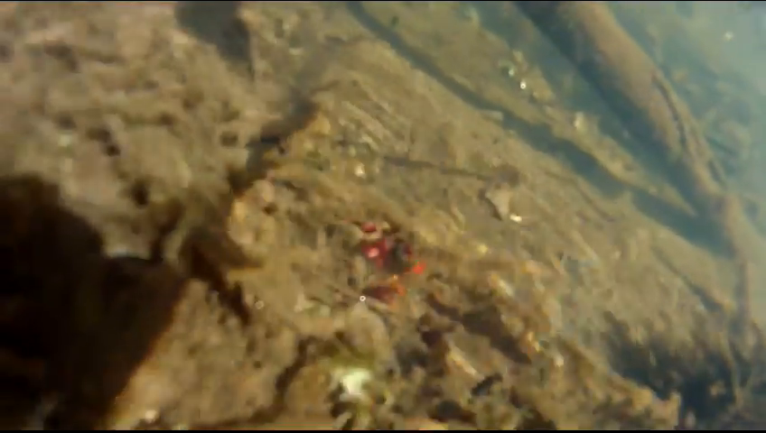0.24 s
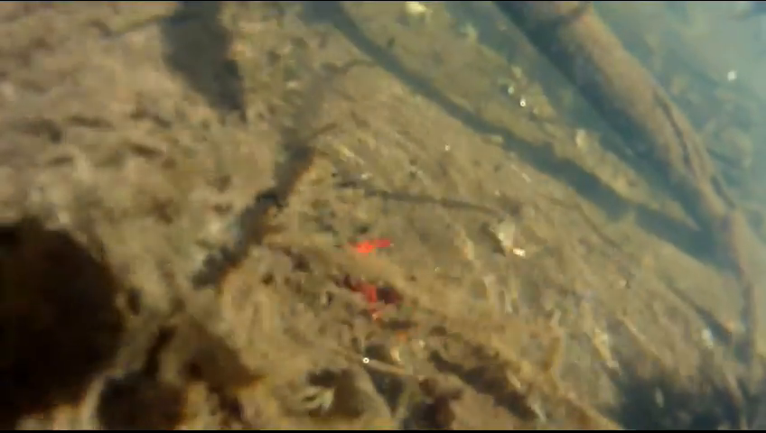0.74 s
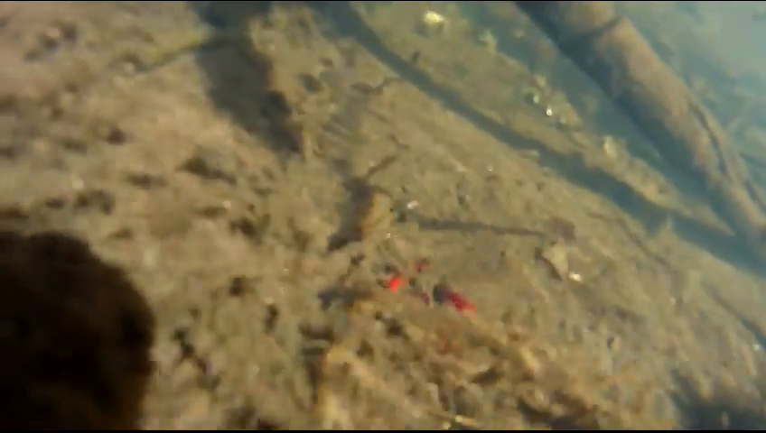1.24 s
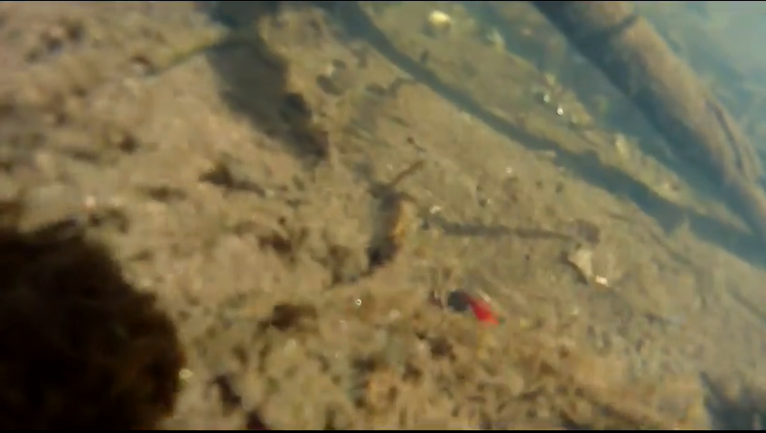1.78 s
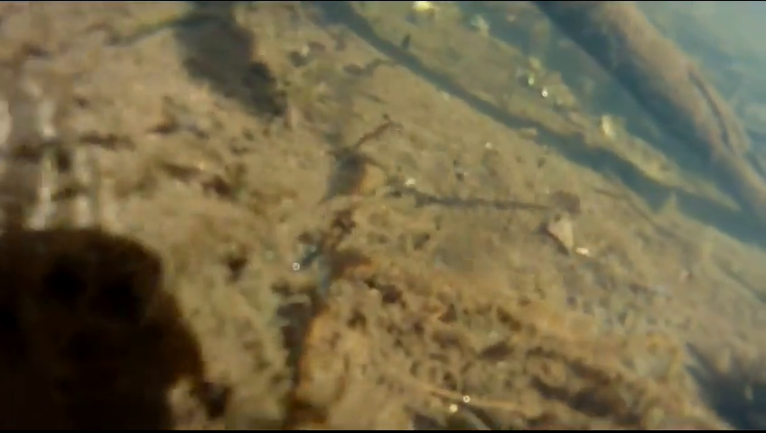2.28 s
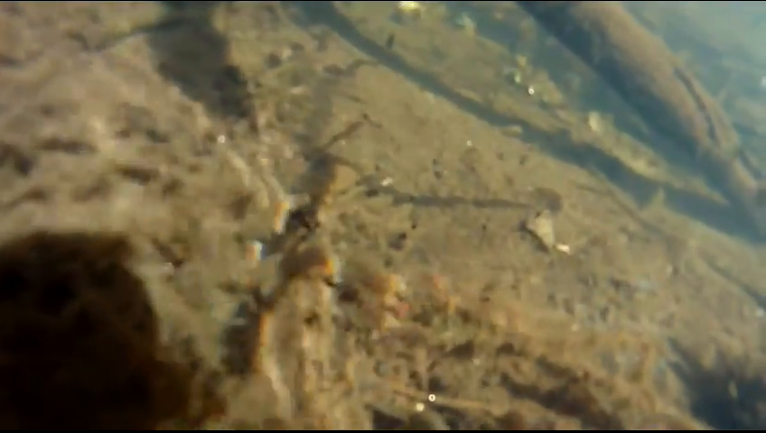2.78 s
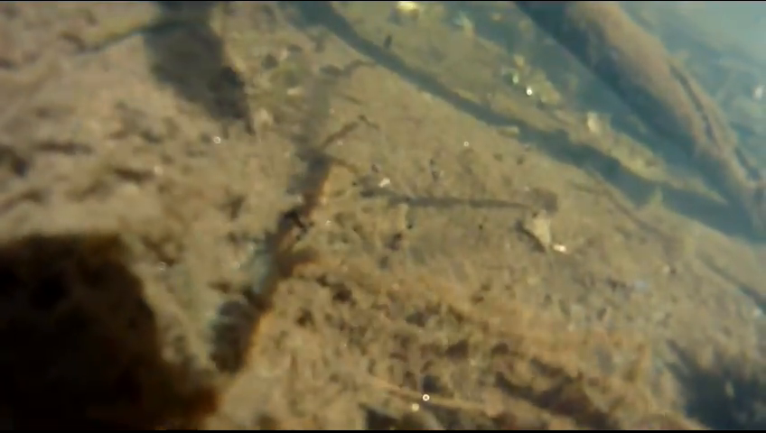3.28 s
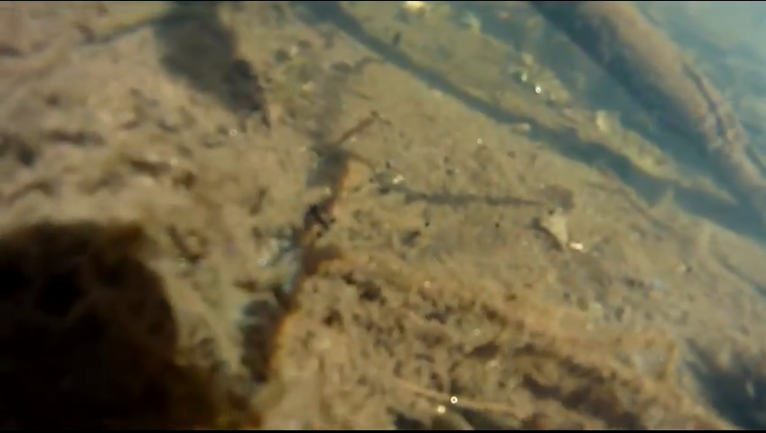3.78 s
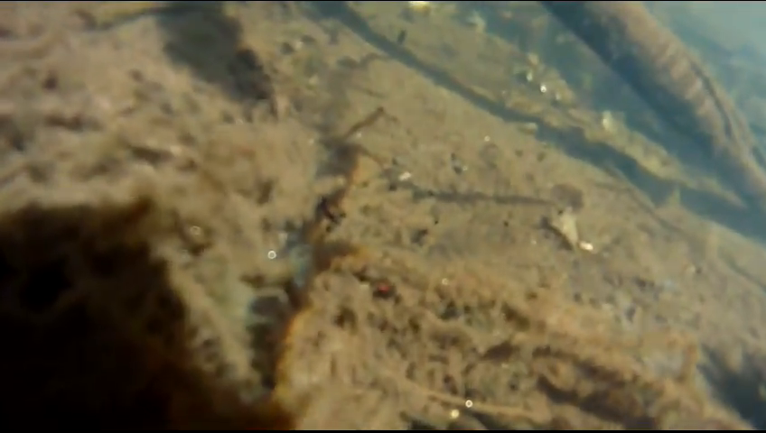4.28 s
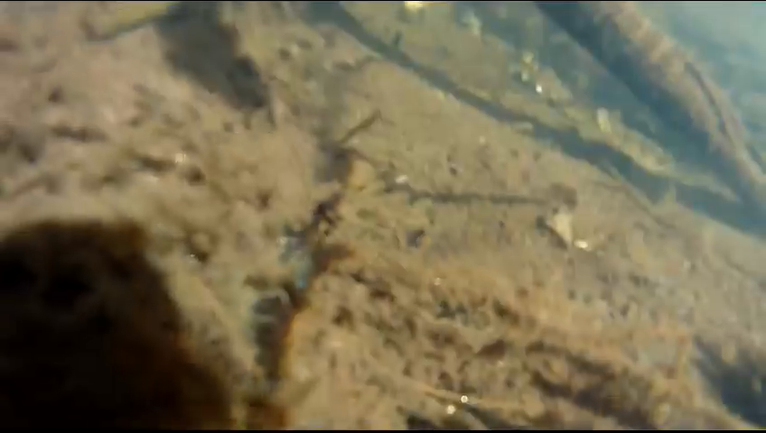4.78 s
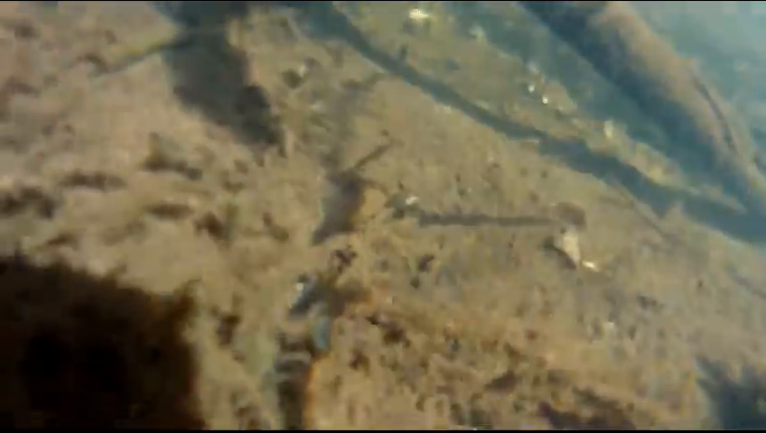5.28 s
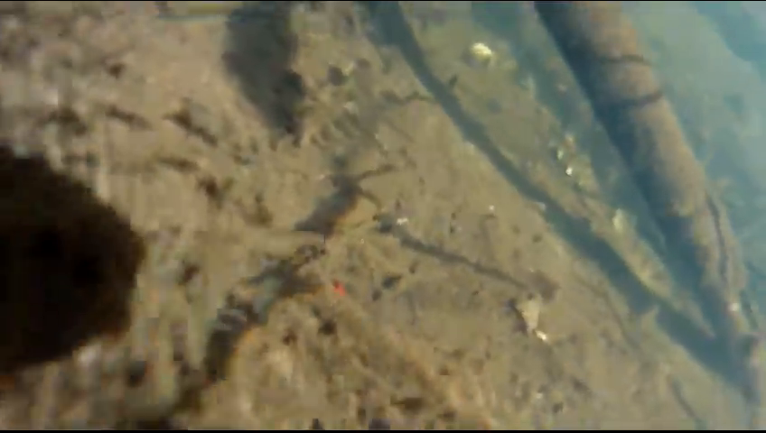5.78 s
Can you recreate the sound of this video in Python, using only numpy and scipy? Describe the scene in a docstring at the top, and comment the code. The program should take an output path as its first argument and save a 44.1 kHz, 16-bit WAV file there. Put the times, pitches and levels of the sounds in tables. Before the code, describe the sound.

A submerged plastic housing is gripped and rubbed in a shallow river: low water swirls, gritty scuffs, clicks and increasingly loud, ringing knocks.

```python
"""In a shallow river, a camera in a plastic housing is held under water. Water noise rumbles and gurgles around
the case, and a hand rubs it so that its resonances ring. Damped tones and cracks make the knocks, pressure
pulses the thumps, short tones the bubbles and grit. Filtered grains make the coarse scrapes of the hand on the
case; a palm boom and a fingertip squeak are tuned noise. The microphone inside overloads on the hardest thumps,
and coarse sampling adds a thin fizz."""
import sys
import numpy as np
from scipy import signal
from scipy.fft import rfft, irfft
from scipy.io import wavfile
from scipy.ndimage import uniform_filter1d

SR = 44100
rng = np.random.default_rng(int(sys.argv[2]) if len(sys.argv) > 2 else 0)


def output_pcm(signal):
    """Save a mono or channel-first signal as 16-bit PCM at the path in sys.argv[1].

    Samples are clipped to [-1, 1] before scaling.
    """
    pcm = np.clip(np.atleast_2d(signal).T, -1, 1) * 32767
    wavfile.write(sys.argv[1], SR, np.round(pcm).astype(np.int16))


N = 266364
T = np.arange(N) / SR  # time of each sample, s
HZ = np.fft.rfftfreq(N, 1 / SR)  # frequencies of the filters

# All levels in the tables are relative: each layer adds its own trim.
# how hard the hand drags on the case: time [s], level [dB]
DRAG = [(0, -48), (.2, -38.5), (.85, -37.5), (1.36, -35), (1.65, -39), (1.77, -39), (1.85, -39), (2.2, -34),
        (2.62, -34), (2.722, -28.5), (2.76, -40.5), (2.93, -46), (3.23, -47.5), (3.42, -35.5),
        (4.02, -38.5), (4.16, -49.5), (4.76, -32), (4.88, -57), (4.96, -49), (5.12, -28.5), (5.32, -30),
        (5.52, -26.5), (6.04, -24)]
# strength of the rasp compared with the body of the rubbing: time [s], level [dB]
RASP = [(0, -3), (.5, -1), (1.1, -.5), (1.385, -5.5), (1.43, -10.5), (2.05, -10), (2.3, -7), (3.25, -10),
        (3.72, -4.5), (4.3, -13.5), (4.75, -7.5), (4.89, -14), (5.05, -11.5), (5.25, -16), (5.65, -7.5),
        (5.78, -10), (6.04, -9)]
# knocks, each a ring and a crack: start [s], ring_level [dB], ring_pitch [Hz], crack_level [dB], crack_top [Hz]
KNOCKS = [(.0795, -22, 744, -36, 2030), (.5758, -14, 630, -43, 2000), (1.275, -15, 700, -33, 2980),
          (1.3558, -15, 680, -24, 4200), (1.6591, -28, 670, -15.5, 2000), (1.7922, -12.5, 1100, -30, 3000),
          (1.8645, -11, 830, -15.5, 3270), (1.901, -31, 910, -35, 2190), (1.9649, -22, 1090, -24.5, 2480),
          (2.7255, -8, 825, -27, 2200), (3.0815, -22, 884, -24, 2100), (3.0968, -19.5, 845, -32, 1500),
          (3.253, -21.5, 696, -46, 1500), (3.9538, -13.5, 930, -47, 2000), (4.284, -22.5, 830, -48, 2000),
          (4.6958, -4, 880, -13, 3640), (4.8533, -9.5, 484, -12, 4100), (5.155, -3.5, 906, -27, 2230),
          (5.2325, 1, 918, -11.5, 3100), (5.3755, -5.5, 780, -13, 2410), (5.4698, -3, 938, -30, 2800),
          (5.491, -8, 970, -21, 3500), (5.6925, -8.5, 946, -27, 2600), (5.795, -8.5, 1020, -24, 2400),
          (5.923, -22, 980, -28, 2500), (6.001, 3.5, 1024, -21, 3500)]
# a pressed finger judders in evenly spaced slips: centre of the first slip, spacing
FIRST_SLIP_S, SLIP_GAP_S = 5.613, 0.0458


def amp(db):
    """Turns decibels into a gain."""
    return 10 ** (np.asarray(db) / 20)


def unit(x):
    """Scales to an rms (average strength) of 1."""
    return x / np.sqrt(np.mean(x ** 2) + 1e-20)


def curve(rows):
    """Joins the points of a (time, value) table into a curve over time."""
    return np.interp(T, *np.transpose(rows))


def shaped(x, gain):
    """Filters by a gain for each frequency."""
    return irfft(rfft(x) * gain, N)


def spectrum(points):
    """Turns (Hz, dB) points into a gain for each frequency."""
    hz, db = np.transpose(points)
    return amp(np.interp(np.log(HZ + 1), np.log(hz), db))


def wander(rate_hz):
    """Makes random motion of rms 1, mostly slower than rate_hz."""
    noise = rng.standard_normal(N)
    return unit(shaped(noise, 1 / (1 + (HZ / rate_hz) ** 4)))


def grains(per_s, spread_db):
    """Makes random clicks of either sign, a few much larger than the rest."""
    size = amp(spread_db * np.minimum(rng.exponential(1, N), 4))
    sign = rng.choice([-1, 1], N)
    lands = rng.random(N) < per_s / SR
    return unit(size * sign * lands)


def steadied(x, size):
    """Evens out the slow level of a noise and keeps its fine lumps; size is in samples."""
    power = uniform_filter1d(uniform_filter1d(x ** 2, size), size)
    return x / np.sqrt(power + 1e-9)


def ringing(x, gain):
    """Filters so that every click rings only after it lands (minimum phase)."""
    cepstrum = irfft(np.log(np.maximum(gain, 1e-5)), N)
    cepstrum[1:N // 2] *= 2  # fold all of the response to after the click
    cepstrum[N // 2 + 1:] = 0
    return shaped(x, np.exp(rfft(cepstrum)))


def low_pass(x, edge_hz, size):
    """Cuts steeply above edge_hz."""
    taps = signal.firwin(size, edge_hz, window=("kaiser", 8), fs=SR)
    return signal.oaconvolve(x, taps, "same")


def resonate(x, hz, width_hz):
    """Rings at the pitch hz, which may move; two passes make the sides steep."""
    turn = np.exp(2j * np.pi * np.cumsum(hz * np.ones(N)) / SR)
    r = np.exp(-np.pi * width_hz / SR)
    slow = signal.lfilter([1], [1, -2 * r, r * r], x / turn)  # shift to 0 Hz, smooth twice
    return unit((turn * slow).real)


def patchy(x, depth_db, span_s, band_hz, size):
    """Lets each band swell and fade on its own."""
    z = signal.stft(x, nperseg=size)[2]
    field = rng.standard_normal(z.shape)
    field = uniform_filter1d(field, max(round(span_s * 2 * SR / size), 1), axis=1)
    field = uniform_filter1d(field, max(round(band_hz * size / SR), 1), axis=0)
    return signal.istft(z * amp(depth_db * unit(field)), nperseg=size)[1][:N]


def swell(s, rise, fall, hold=0):
    """Makes a smooth hump of height 1: attack, hold, release, all in seconds."""
    going_up = np.clip((T - s) / rise, 0, 1)
    going_down = np.clip((T - s - rise - hold) / fall, 0, 1)
    return np.sin(np.pi / 2 * (going_up - going_down)) ** 2


def hump(s, half):
    """Makes a bell of height 1 centred on s, reaching zero 2 * half to either side."""
    return np.maximum(1 - ((T - s) / (2 * half)) ** 2, 0) ** 2


def gestures(rows, attack, release):
    """Makes one envelope for each row that begins with a start and a length in seconds."""
    return np.array([swell(s, attack, release, max(length - attack, 0)) for s, length, *_ in rows])


def grip():
    """Follows how the hand holds the case, from 0 (loose) through 1 (cupped) to 2 (pressed)."""
    # hold of the hand: time [s], grip [0-2, limited below]
    hold_points = [(0, 0), (1.3, 0.1), (1.9, 0.26), (2.15, 0.977), (4.9, 0.93), (5.15, 1.28), (5.45, 1.66),
                   (5.6, 1.98), (5.8, 2.11)]
    return np.clip(curve(hold_points), 0, 2)


def thumps(rebound=0.12, rebound_rise=0.0054, rebound_fall=0.083, quick=0.028):
    """Each push squeezes the air in the case; after a quick one the wall springs back past its rest."""
    # pressure thumps through the case: start [s], signed pressure [relative], rise [s], fall [s]
    pushes = [(-.001, -0.94, 0.0033, 0.24), (0.1025, 0.46, 0.0048, 0.0015), (0.108, -0.36, 0.0032, 0.0043),
              (0.3868, 0.7, 0.0017, 0.002), (0.5377, 0.13, 0.00078, 0.0034), (0.576, 0.41, 0.0015, 0.0041),
              (1.359, 0.26, 0.0021, 0.0019), (1.412, 0.62, 0.0057, 0.0015), (1.465, 0.45, 0.002, 0.0087),
              (1.497, 0.43, 0.0048, 0.0026), (1.6578, 0.33, 0.0025, 0.0061), (1.7556, 0.75, 0.0056, 0.0034),
              (1.8135, 0.24, 0.0022, 0.0023), (1.8182, -0.25, 0.0022, 0.0038),
              (1.8304, -0.62, 0.0023, 0.0046), (1.844, .25, 0.0055, .008), (1.867, -0.44, 0.0026, 0.0073),
              (1.884, .22, 0.0034, 0.0064), (1.8974, 0.42, 0.00245, 0.0039), (1.9043, -1.04, 0.0015, 0.11),
              (3.0822, 0.41, 0.0025, 0.0068), (3.253, 0.35, 0.0028, 0.005), (3.257, -0.19, 0.0014, 0.0042),
              (3.775, -0.26, 0.0017, 0.013), (4.852, -1.84, 0.0018, 0.0033), (5.942, 0.62, 0.0044, 0.011)]
    out = np.zeros(N)
    for s, pressure, rise, fall in pushes:
        strength = rebound * np.exp(-fall / quick)
        spring = strength * swell(s + rise + fall / 2, rebound_rise, rebound_fall)
        out += pressure * (swell(s, rise, fall) - spring)
    return out


def water(sway_db=5, buffet_db=-2, shove_db=-0.5, gurgle_db=2.0, eddies_per_s=260, spread_db=3.0,
          surge_db=2.5, surge_hz=7):
    """Slow pressure swings, buffets on the moving case and small eddies that ring as a gurgle."""
    # spectra of the slow sway and of the buffets: pitch [Hz], level [dB]
    sway_colour = [(8, -46), (18, 22), (28, 14), (40, 16), (55, -13), (90, -26), (200, -126)]
    buffet_colour = [(25, -6), (45, 8), (70, 19.5), (100, -1), (150, -0.5), (300, -41), (700, -76)]
    # gurgle round the open case and under the cupping hand: pitch [Hz], level [dB]
    open_colour = [(50, -41), (90, -5.5), (130, 4.5), (160, -2), (195, -2), (260, -4.5), (340, -12),
                   (480, -16.5), (1000, -61.5)]
    cupped_colour = [(50, -40), (90, -6), (130, 4), (160, -3.5), (195, -1.5), (270, -7.5), (340, -15.5),
                     (480, -26), (1000, -74)]
    # current round the case: time [s], level [dB]
    flow = [(0, -42.5), (.27, -32), (1.4, -31.5), (1.9, -33), (2.3, -36), (2.95, -42), (3.75, -40.5),
            (4.22, -42), (4.7, -35.5), (4.88, -45), (4.97, -45), (5.03, -34), (5.78, -39.5), (6.04, -29)]
    # slow rocking of the camera: time [s], level [dB]
    rocking = [(0, -27.5), (.2, -33.5), (.55, -30), (.75, -38), (1.3, -33), (1.45, -43), (2.6, -31),
               (3.05, -27.5), (4.7, -27.5), (4.92, -31.5), (5.3, -17.5), (5.6, -29), (5.8, -24),
               (6.04, -29)]
    # shoves through the water: start [s], length [s], buffet_level [dB], sway_level [dB]
    shoves = [(1.39, 0.19, -31, -27.5), (1.809, 0.085, -22, -19.5), (1.993, 0.11, -23, -24),
              (2.135, 0.096, -20, -23.5), (2.33, 0.074, -22, -16), (2.738, 0.048, -31.5, -23),
              (5.172, 0.08, -26, -16.5)]

    sway = steadied(shaped(rng.standard_normal(N), spectrum(sway_colour)), size=5000)
    buffet = steadied(shaped(rng.standard_normal(N), spectrum(buffet_colour)), size=3000)
    eddies = grains(eddies_per_s, spread_db) + .5 * rng.standard_normal(N)
    cupped = np.minimum(grip(), 1)
    open_gurgle = (1 - cupped) * ringing(eddies, spectrum(open_colour))
    cupped_gurgle = cupped * ringing(eddies, spectrum(cupped_colour))
    gurgle = steadied(open_gurgle + cupped_gurgle, size=4000)
    current = amp(curve(flow) + surge_db * wander(surge_hz))
    push, swing = amp(np.array(shoves)[:, 2:].T) @ gestures(shoves, attack=0.021, release=0.03)
    return (sway * amp(sway_db) * np.hypot(amp(curve(rocking)), swing)
            + buffet * np.hypot(amp(buffet_db) * current, amp(shove_db) * push)
            + gurgle * amp(gurgle_db) * current)


def housing(drive):
    """The case rings with whatever drives it; the grip decides which resonances speak."""
    # resonances of the housing: pitch [Hz], width [Hz], loose [dB], cupped [dB], pressed [dB]
    resonances = [(444, 145, 12, -17, -9.5), (631, 187, 11, -4, -11), (770, 91, 7.5, 3.5, 1.5),
                  (905, 134, -13, -2.5, -4), (975, 61, -5, -3.5, 6), (1023.4, 52, 8.5, -2, 8.5),
                  (1149, 58, -4, 1, -6), (1310, 190, 6, -37, -22), (1490, 118, 8, -12, -22),
                  (1626, 106, 2, 0.5, -10.5), (1740, 170, -24, -8, -25), (2024, 243, -26, -3, -10.5),
                  (2427, 157, 2, -17, -12.5), (2576, 130, -13, -4.5, -23), (2770, 89, -16, -9, -24),
                  (2958, 180, -4.5, -13.5, -11.5), (3504, 300, -11.5, -21.5, -17.5),
                  (3994, 170, -31, -22, -20.5), (4135, 130, -14, -27, -19.5), (4390, 240, -15.5, -23, -26),
                  (5060, 390, -17.5, -61, -27.5)]
    # broadening of the resonances for loose, cupped, pressed: factor on the width
    broadening = [1.84, 1.72, 1.08]
    # dips where the walls of the housing cancel: pitch [Hz], width [Hz], depth [0-1]
    dip_rows = [(1126, 30, 0.19), (2310, 62, 0.33), (4560, 81, 0.2)]
    hold, sound = grip(), np.zeros(N)
    dips = np.ones(len(HZ))
    for hz, width, depth in dip_rows:
        dips *= 1 - depth / (1 + ((HZ - hz) / width) ** 2)
    for k, factor in enumerate(broadening):
        power = np.zeros(len(HZ))
        for hz, width, *db in resonances:
            power += amp(db[k]) ** 2 / (1 + (2 * (HZ - hz) / (width * factor)) ** 2) ** 2
        share = np.sqrt(np.maximum(1 - abs(hold - k), 0))  # crossfade between neighbouring grips
        sound += share * ringing(drive, unit(dips * np.sqrt(power)))
    return sound


def flexing(x, share, rate_hz):
    """The wall flexes under the hand and bends all its resonances up and down by a small share."""
    return np.interp(T + share / (2 * np.pi * rate_hz) * wander(rate_hz), T, x)


def judder(count=3, half_slip_s=0.0063, slip_db=8):
    """Adds friction in dB from a finger that sticks and slips at a steady pace."""
    return sum(slip_db * hump(FIRST_SLIP_S + k * SLIP_GAP_S, half_slip_s) for k in range(count))


def friction(tremor_db=1.04, tremor_hz=9):
    """Sums drag, strokes, slips, judder and hand tremor into rubbing level and rasp, both in dB."""
    # fingers slide harder for a moment: start [s], length [s], extra_level [dB], extra_rasp [dB]
    strokes = [(0.79, 0.07, 4.5, 0), (1.162, 0.033, 8, -3), (1.807, 0.034, 5.5, 7.5),
               (1.936, 0.012, 6.5, 1), (2.338, 0.06, 6.5, -1.5), (3.023, 0.031, 2.5, -2),
               (3.123, 0.02, 7.5, 1), (3.731, .11, 4, 0), (4.316, 0.046, 4.5, -1), (4.684, 0.027, 2, 1.5),
               (5.105, 0.028, 5.5, 3.5), (5.369, 0.045, 5.5, 0), (5.466, 0.058, 4.5, -1),
               (5.919, 0.019, 7, -4.5), (5.973, 0.017, 7, -4.5)]
    # skin catches and slips in gritty rushes: centre [s], half_length [s], extra_level [dB], extra_rasp [dB]
    slips = [(0.481, 0.0037, 1.5, 4.5), (0.742, 0.018, 6, -1.5), (1.195, 0.0082, 3, -3.5),
             (2.24, 0.054, 4.5, 1.5), (2.376, 0.01, 4.5, 6.5), (4.698, 0.0049, 7, -3),
             (5.115, 0.0022, 9.5, -8), (5.246, 0.0068, 1.5, 4), (5.298, 0.003, -3, 4),
             (5.382, 0.0073, 3, 2.5), (5.412, 0.0067, 2, 4), (5.474, 0.014, 7, 1.5), (5.494, 0.005, 3.5, 2),
             (5.519, 0.012, 4, 0.5), (5.571, 0.025, 5, .5), (5.853, 0.014, 5, -6.5),
             (5.709, 0.005, 3.5, -1), (5.892, 0.014, 5.5, -3), (5.952, 0.009, 9.5, -5.5),
             (5.995, 0.0056, 9, 2)]
    stroke_shapes = gestures(strokes, attack=0.0076, release=0.038)
    stroke_db, stroke_rasp_db = np.array(strokes)[:, 2:].T @ stroke_shapes
    slip_shapes = np.array([hump(s, half) for s, half, *_ in slips])
    slip_db, slip_rasp_db = np.array(slips)[:, 2:].T @ slip_shapes
    level_db = curve(DRAG) + stroke_db + slip_db + judder() + tremor_db * wander(tremor_hz)
    return level_db, curve(RASP) + stroke_rasp_db + slip_rasp_db


def rubbing(per_s=3000, spread_db=1.5, hiss=0.87, flutter_db=1.9, flutter_hz=55, body_db=-1.21,
            bright_db=-3.5, split_hz=1330, top_hz=3200, top_db=6, top_follow=0.61):
    """Tiny stick-slips ring the housing: a round body and a rasp above it."""
    drive = unit(grains(per_s, spread_db) + hiss * rng.standard_normal(N))
    drive *= amp(flutter_db * wander(flutter_hz))
    sound = flexing(housing(drive), share=.012, rate_hz=6.14)
    sound = patchy(sound, depth_db=3.0, span_s=.04, band_hz=350, size=512)  # the contact point creeps
    body = shaped(sound, 1 / (1 + (HZ / split_hz) ** 20))
    level_db, brightness_db = friction()
    rasp = steadied(sound - body, size=1600)
    low_rasp = shaped(rasp, 1 / (1 + (HZ / top_hz) ** 20))
    top_gain = amp(top_db + top_follow * brightness_db)  # soft contact loses the top first
    rasp = low_rasp + (rasp - low_rasp) * top_gain
    body = amp(body_db) * steadied(body, size=1200)
    return amp(level_db) * (body + amp(bright_db + brightness_db) * rasp)


def palm_boom(boom_hz=196, width_hz=65, drag_share_db=-17):
    """Friction and presses excite the air pocket under the palm, so the hollow case booms."""
    # presses of the palm: start [s], length [s], level [dB]
    presses = [(4.626, 0.057, -29.5), (5.128, 0.12, -26), (5.293, 0.23, -23.5), (5.51, 0.12, -33.5),
               (5.875, 0.089, -28)]
    boom = steadied(resonate(rng.standard_normal(N), boom_hz, width_hz), size=2500)
    pressed = amp(np.array(presses)[:, 2]) @ gestures(presses, attack=0.069, release=0.062)
    return boom * np.hypot(amp(drag_share_db + curve(DRAG)), pressed)


def bubbling(level_db=-7, per_s=110, spread_db=3, low_hz=1050, high_hz=3000, tilt_db=-8,
             cycles=16, count=12):
    """Tiny bubbles ping against the open case, following drag and rasp, until the hand cups it."""
    t, out = np.arange(1024) / SR, np.zeros(N)
    for place in np.linspace(0, 1, count):
        hz = low_hz * (high_hz / low_hz) ** place
        decay = np.exp(-np.log(1000) * t * hz / cycles)  # falls 60 dB in this many cycles
        ping = unit(np.sin(2 * np.pi * hz * t) * decay)
        out += amp(tilt_db * place) * signal.oaconvolve(grains(per_s / count, spread_db), ping)[:N]
    openness = np.maximum(1 - grip(), 0)
    return unit(out) * amp(level_db + curve(DRAG) + curve(RASP)) * openness


def knocks(attack=0.0015, level_db=2, loose_cycles=9.6, pressed_cycles=26):
    """One damped tone for each knock; low ones ring longer, and so does the pressed case."""
    out, pressed = np.zeros(N), np.maximum(grip() - 1, 0)
    for s, db, hz, *_ in KNOCKS:
        cycles = loose_cycles + (pressed_cycles - loose_cycles) * np.interp(s, T, pressed)
        t60 = cycles / hz  # seconds to fall 60 dB
        near = (T >= s) & (T < s + 2 * t60)
        t = T[near] - s
        envelope = amp(level_db + db - 60 * t / t60) * (1 - np.exp(-t / attack))
        out[near] += envelope * np.sin(2 * np.pi * hz * t)
    return out


def ticks(level_db=-3.0, soft_s=0.00015, crack_s=0.0014, scrape=0.15, scrape_s=0.0027):
    """Short cracks of the knocks come through the wall of the case; soft contacts are dull."""
    force = np.zeros(N)
    t = np.arange(1024) / SR
    # the contact scrapes on briefly after the crack
    envelope = (np.exp(-t / crack_s) + scrape * np.exp(-t / scrape_s)) * (1 - np.exp(-t / soft_s))
    for s, _, _, db, top_hz in KNOCKS:
        burst = unit(envelope * rng.standard_normal(len(t))) * np.sqrt(np.mean(envelope ** 2))
        dulled = signal.lfilter(*signal.butter(4, top_hz, fs=SR), burst)
        part = force[round(s * SR):][:len(t)]
        part += amp(db) * dulled[:len(part)]
    wall = spectrum([(200, 8.0), (800, 19.0), (1500, 7.5), (2800, 5), (4200, -2.0), (5500, 9.5)])
    return amp(level_db) * ringing(force, wall)


def bubbles(level_db=-1.5, attack=0.0015, release=0.0023):
    """Each air pocket bursts, throbs briefly as a tone and is then smothered against the wall."""
    # air pockets that burst against the case: start [s], peak [dB], pitch [Hz], length [s]
    pockets = [(0.472, -30, 1300, 0.005), (0.6, -24, 1380, 0.0046), (0.7515, -28, 1260, 0.0053),
               (0.798, -32, 1030, 0.0062), (.8667, -28, 1230, 0.0072), (0.955, -30, 1040, 0.003),
               (1.443, -24, 614, 0.0032), (2.449, -19.5, 648, 0.0064), (3.9875, -16, 350, 0.0067),
               (3.9882, -29.5, 557, 0.0041), (4.013, -28, 248, 0.012)]
    out = np.zeros(N)
    for s, db, hz, length in pockets:
        envelope = swell(s, attack, release, length - attack)
        out += amp(level_db + db) * envelope * np.sin(2 * np.pi * hz * (T - s))
    return out


def scrapes(level_db=-0.5, per_s=700, spread_db=4.0, hiss=0.42, stop_s=0.0053):
    """The hand scrapes roughly over the case: coarse grains that swell and stop abruptly."""
    # rough scrapes of the hand on the case: start [s], length of the swell [s], level [dB]
    scuffs = [(1.153, 0.052, -30), (1.803, 0.096, -31.5), (2.344, 0.036, -31.5), (2.682, 0.048, -32.5)]
    # spectrum of the scuffing: pitch [Hz], level [dB]
    scuff_colour = [(150, -7), (500, -0.5), (900, 1.5), (1400, -3.5), (2100, -8), (2800, -9.5), (3400, -42)]
    grain = grains(per_s, spread_db) + hiss * rng.standard_normal(N)
    sound = steadied(ringing(grain, spectrum(scuff_colour)), size=500)
    return sound * sum(amp(level_db + db) * swell(s, length, stop_s) for s, length, db in scuffs)


def grit(level_db=-5.0, rise_cycles=0.75):
    """Each grain of grit strikes the case with a soft tick of a few cycles."""
    # grains that strike: start [s], peak [dB], pitch [Hz]
    strikes = [(1.7915, -26, 4140), (1.809, -33, 3500), (1.8158, -20, 2800), (1.828, -24, 4200),
               (2.0927, -26.5, 4200), (3.004, -35, 1980), (3.0435, -27, 2230), (3.1295, -27, 1790),
               (3.1715, -35, 2080), (3.2838, -26.5, 2600), (4.098, -31.5, 1850), (4.249, -36, 1900),
               (4.274, -34, 1520)]
    t, out = np.arange(512) / SR, np.zeros(N)
    for s, db, hz in strikes:
        age = t * hz / rise_cycles
        envelope = age * np.exp(1 - age)
        out[round(s * SR):][:len(t)] += amp(level_db + db) * envelope * np.sin(2 * np.pi * hz * t)
    return out


def squeak(start_s=1.96, rise_s=0.102, fall_s=0.022, start_hz=1347, sag_hz_per_s=4580,
           width_hz=95, level_db=-29):
    """A fingertip squeaks by friction, falling in pitch as it slows."""
    pitch_hz = start_hz - sag_hz_per_s * np.clip(T - start_s, 0, rise_s + fall_s)
    tone = steadied(resonate(rng.standard_normal(N), pitch_hz, width_hz), size=900)
    return tone * amp(level_db) * swell(start_s, rise_s, fall_s)


def jolts(push=0.46):
    """The finger rocks the case at the pace of its slips, beginning before them and fading after."""
    beat = (T - FIRST_SLIP_S) / SLIP_GAP_S
    envelope = swell(FIRST_SLIP_S - 2 * SLIP_GAP_S, 2 * SLIP_GAP_S, 4 * SLIP_GAP_S)
    return push * np.cos(2 * np.pi * beat) * envelope


def scene():
    """Everything reaches the one microphone inside the case."""
    pressure = thumps() + water() + rubbing() + palm_boom() + bubbling() + knocks() + ticks()
    pressure += bubbles() + scrapes() + grit() + squeak() + jolts()
    return np.array([pressure, pressure])


def record(dry, rail=0.84, coupling_hz=45, alias_hz=5750, sampling_hz=12000, image_db=-2.0,
           hiss_db=-70, edge_hz=15250):
    """The input overloads and sheds its deepest bass; held samples mirror the sound into the treble."""
    # difference between the channels: pitch [Hz], level [dB]
    side_colour = [(30, -53), (120, -58), (280, -45), (550, -36), (1000, -55), (2000, -23), (4000, -18.5),
                   (8000, -20), (12000, -18.5)]
    x = dry.mean(0)
    x = x / (1 + (x / rail) ** 20) ** (1 / 20)  # while pinned at the rail, all other sound drops out
    x = x + amp(hiss_db) * wander(1400)  # faint dull hiss of the input
    x = signal.lfilter(*signal.butter(1, coupling_hz, "highpass", fs=SR), x)
    x = low_pass(x, alias_hz, size=121)
    images = 2 * amp(image_db) * x * np.cos(2 * np.pi * sampling_hz * T)
    x = shaped(x + images, np.sinc(HZ / sampling_hz))  # each sample is held until the next
    # the two channels differ by a faint shimmer, mostly in the treble
    side = shaped(x, spectrum(side_colour)) * wander(37)
    return np.array([low_pass(x + sign * side, edge_hz, size=511) for sign in (1, -1)])


dry = scene()
out = record(dry)
output_pcm(out)
```